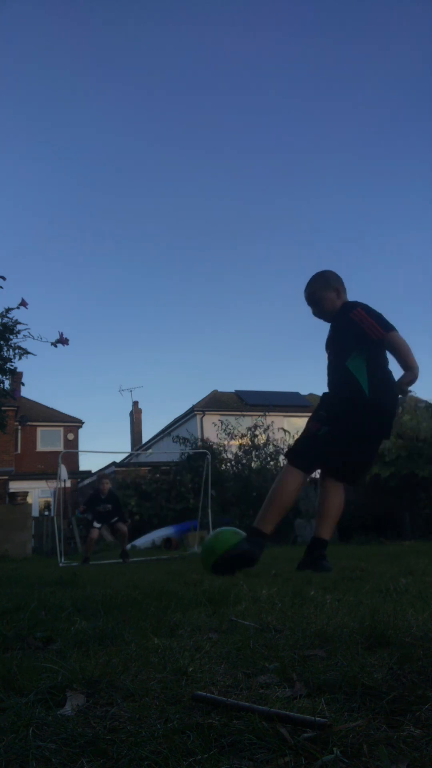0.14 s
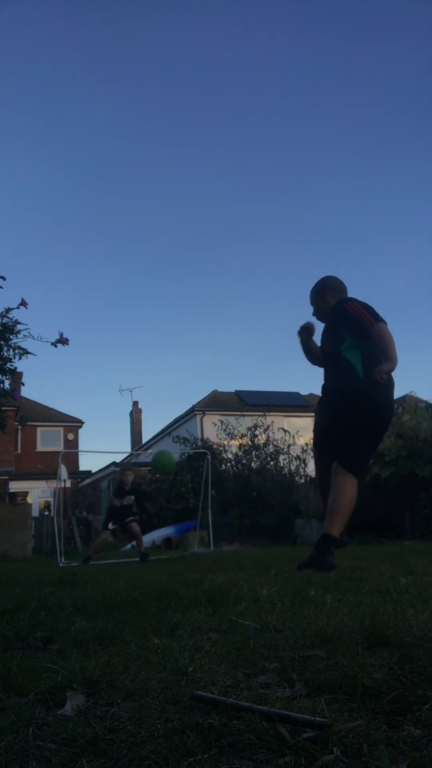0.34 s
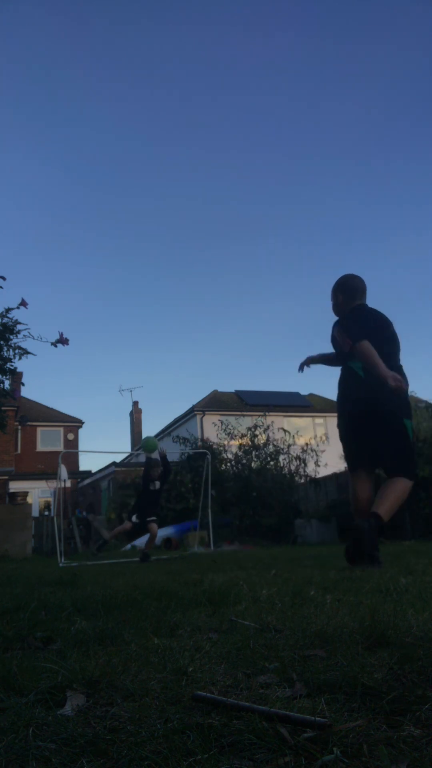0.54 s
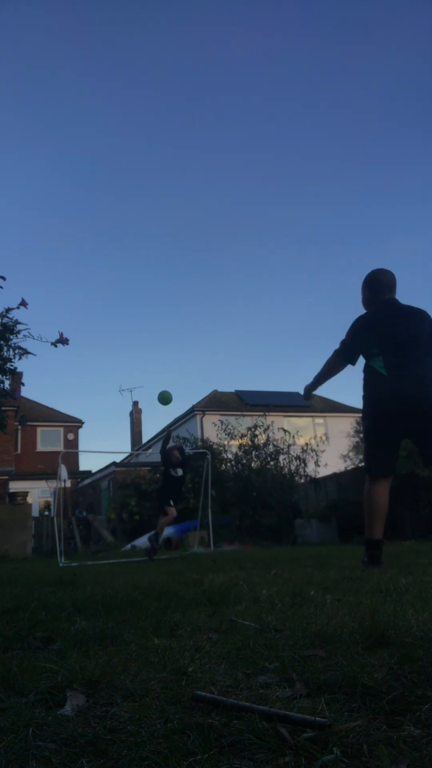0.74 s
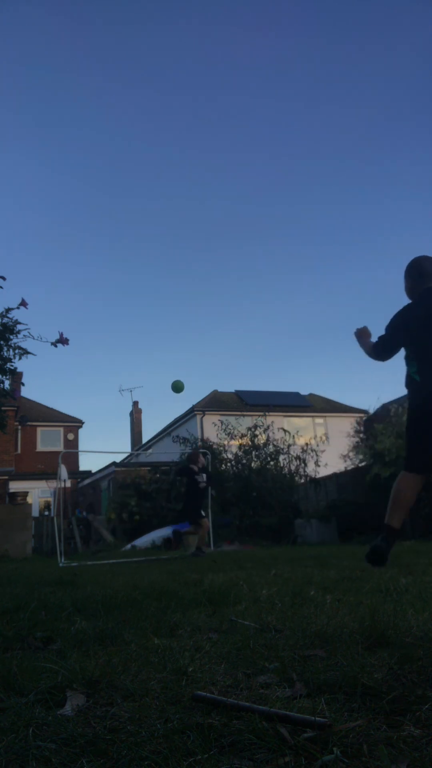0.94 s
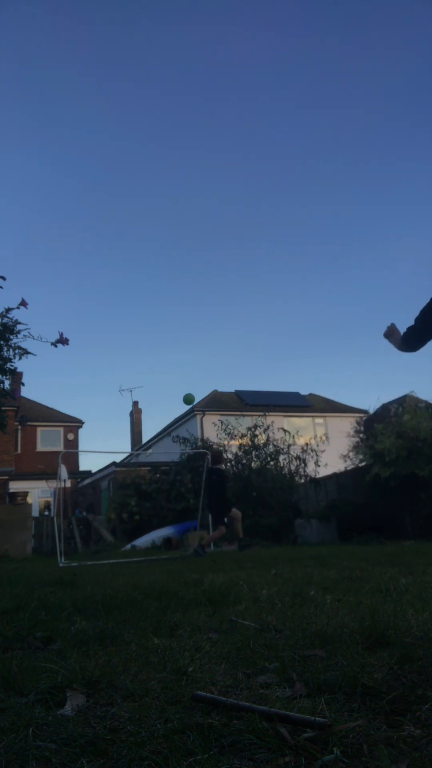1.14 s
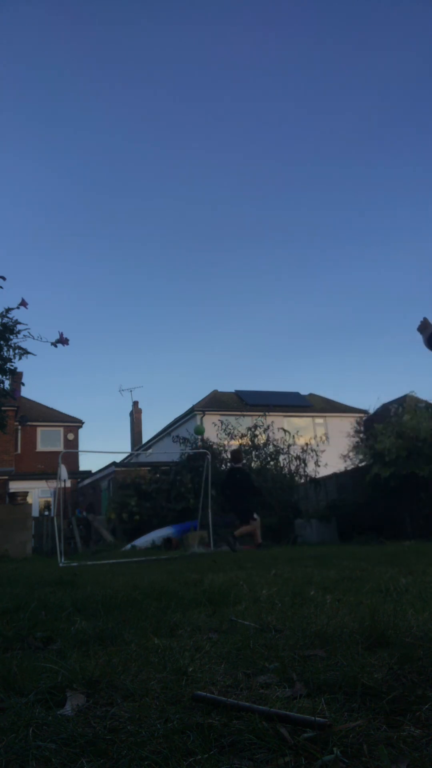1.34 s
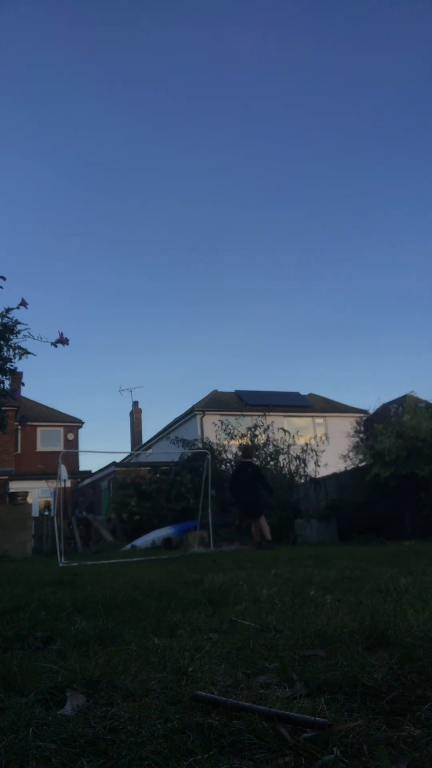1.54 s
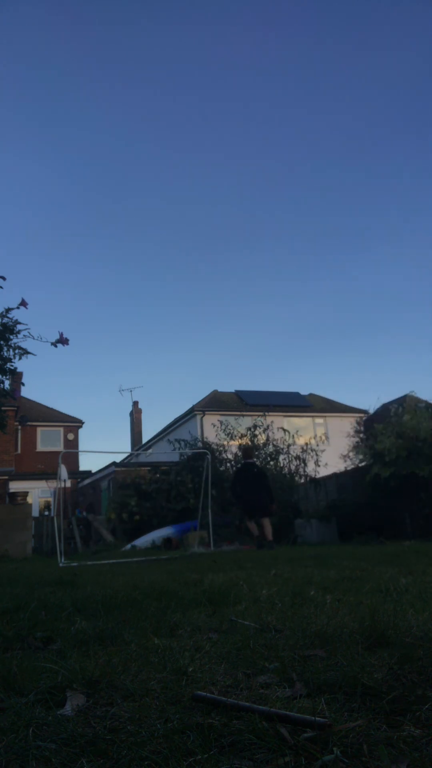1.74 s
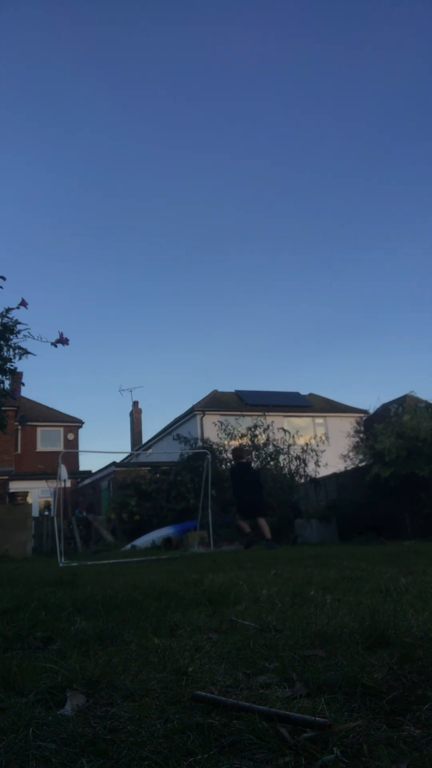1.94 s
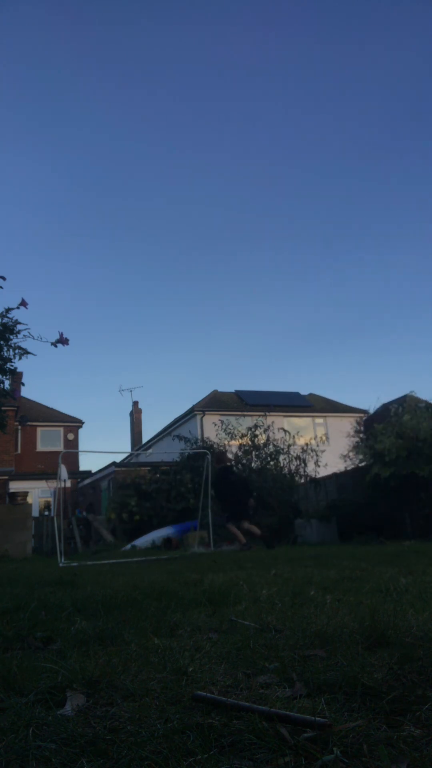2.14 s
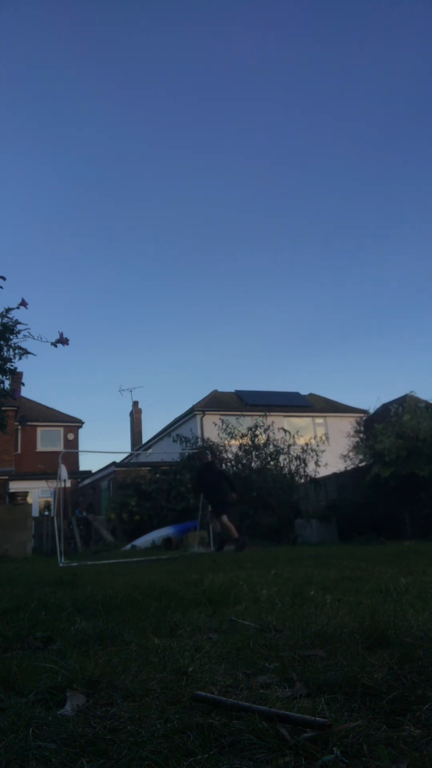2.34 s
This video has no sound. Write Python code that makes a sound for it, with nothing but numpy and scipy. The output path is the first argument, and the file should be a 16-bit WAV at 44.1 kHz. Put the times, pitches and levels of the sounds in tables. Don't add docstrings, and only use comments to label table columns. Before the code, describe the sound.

A football is kicked with a loud, deep, hollow thud and short outdoor echo, then slapped more softly by a keeper; faint footsteps follow and a dull rattling landing at a fence, heard close by a phone.

```python
import sys
import numpy as np
from scipy import signal
from scipy.fft import rfft, irfft
from scipy.io import wavfile
from scipy.ndimage import uniform_filter1d

SR = 44100
rng = np.random.default_rng(int(sys.argv[2]) if len(sys.argv) > 2 else 0)


def magnitude_from_level(level_db):
    exponent = np.asarray(level_db, float) / 20
    return 10 ** exponent


def transcribe(signal):
    frames = np.atleast_2d(signal).T
    limited = np.clip(frames, -1, 1)
    pcm = np.round(limited * 32767).astype(np.int16)
    wavfile.write(sys.argv[1], SR, pcm)


N = 105840

# start_s, ball_db, echo_db, echo_length_scale, echo_tilt_db_per_octave
BALL_HITS = [
    (.2105, -8.5, -31, 1.035, 0.2),
    (.6015, -28, -30, 0.72, 1),
    (2.0825, -36, -31.5, 1.07, -0.5),
]
# pitch_hz, level_db, t60_s (time to fall 60 dB)
BALL_TONES = [(226, 1, 0.027), (350, -4.5, 0.035), (450, 0, 0.034), (672.5, -3.5, 0.022), (945.5, -7, 0.02),
              (1200, -3.5, 0.024), (1420, -9, 0.026), (1713, -9, 0.025), (1950, -16.5, 0.014),
              (2280, -17, .014)]
# freq_hz, level_db
ECHO_COLOUR = [(25, -34.5), (60, 1), (100, -3.5), (200, -3.5), (480, -12.5), (850, -27.5), (1900, -35),
               (16000, -72.5)]
# freq_hz, t60_s
ECHO_LENGTH = [(60, 0.51), (160, 0.49), (420, 0.28), (1100, 0.46), (2900, 0.27), (7700, 0.23)]
# start_s, level_db, t60_s, tilt_db_per_octave
CRACK_EVENTS = [(.194, -46.5, 0.11, -6.5), (.2, -48.5, 0.19, -10), (.2092, -19, 0.017, -8),
                (.2115, -19.5, 0.0078, 3), (.214, -39, 0.17, -4.1), (.241, -40.5, 0.056, -6.5),
                (.26, -43, 0.029, -6.5), (.294, -47.5, .05, -12.5), (.6015, -63, 0.0067, 0),
                (.603, -37.5, 0.028, 0.5), (.608, -55, 0.26, -0.7), (.952, -59, 0.055, -9.5),
                (1.304, -59.5, 0.023, -14), (1.317, -48, 0.044, -15), (1.464, -52, .012, -1),
                (1.481, -44, 0.011, -3), (1.512, -60, .04, 7), (2.0825, -36, 0.017, 4),
                (2.085, -45, 0.19, -0.7)]
# freq_hz, level_db
CRACK_COLOUR = [(150, -45.5), (500, -11.5), (1500, -0.5), (3000, -7), (4500, -6), (7700, -10.5),
                (11000, -15), (16000, -29)]
# start_s, length_s,
# level_db, pitch_hz
DEEP_THUMPS = [(.03, 0.015, -39.5, 53), (.07, 0.068, -36.5, 61), (.2158, 0.029, -8, 76),
               (.25, 0.038, -32.5, 68), (.29, 0.078, -40, 81.3), (.335, 0.049, -40.5, 72),
               (.41, 0.049, -44, 62), (.51, 0.14, -47.5, 65), (.606, 0.051, -28, 74.3),
               (.61, 0.059, -38, 46), (.37, 0.075, -43, 133.4), (.47, 0.059, -42.5, 51),
               (.65, .04, -37, 80), (.44, 0.14, -51.5, 128), (1.0, 0.037, -60, 150),
               (1.45, 0.095, -56.5, 140.9), (2.0, 0.042, -57, 129), (.716, 0.057, -41, 85),
               (.765, .06, -53, 65), (.15, 0.045, -47, 65), (.9, 0.058, -47, 70.6), (.95, 0.072, -55, 63),
               (1.33, 0.12, -52.5, 60), (2.088, 0.014, -33, 74), (2.1025, 0.036, -29.5, 71),
               (2.1, 0.11, -51, 44.4), (2.143, 0.014, -43, 80), (2.169, 0.031, -28, 75),
               (2.203, 0.027, -33, 79.6), (2.243, 0.022, -34.5, 68), (2.288, 0.016, -37, 68.5),
               (2.317, 0.02, -38.5, 68)]
# start_s, level_db, pitch_hz, cycles
KNOCKS = [(.022, -48.5, 244, 3.4), (.046, -37, 160, 0.79), (.054, -46, 650, 5.4),
          (.056, -38.5, 238, 2.5), (.086, -63, 476, 1.6), (.2105, -2.5, 144.3, 0.89),
          (.2405, -21, 270, 1.47), (.240, -28.5, 635, 4.3), (.258, -31.5, 350, 3.2),
          (.47, -39, 266, 1.9), (.491, -31, 257, 2.2), (.52, -38.5, 257, 1.5),
          (.6005, -21.5, 365.3, 3.97), (.608, -29, 263, 1.37), (.61, -48, 159, 1.3),
          (.6035, -27.5, 647, 3.8), (.623, -32.5, 700, 2.3), (.623, -41, 1250, 6),
          (.66, -41.5, 400, 6.6), (.677, -45, 217, 3.8), (.695, -48.5, 261, 5.4), (.72, -55, 460, 3.7),
          (.869, -42.5, 242, 1.3), (.881, -48, 170, 2.2), (.951, -55, 1097, 4), (.97, -57, 1080, 4.2),
          (1.48, -52, 1200, 3.8), (1.5, -51.5, 293, 4.1), (1.545, -54, 241, 5.5),
          (1.304, -44, 1086, 2.4), (1.317, -45.5, 450, 1.67), (1.464, -47.5, 286, 1.83),
          (1.686, -45.5, 347, 1.5), (2.085, -39, 491, 9.8), (2.084, -33.5, 218.7, 2.5),
          (2.092, -36, 315, 1.4), (2.108, -36.5, 470, 4.6), (2.13, -38, 536, 4), (.65, -41, 930, 1.5),
          (2.122, -39.5, 320, 2.8), (2.158, -40, 312, 4.5), (2.176, -43.5, 379, 3.7),
          (2.19, -40.5, 287, 3), (2.21, -44.5, 242, 3.3), (2.226, -46, 262, 2.6),
          (2.262, -49, 200, 4.2)]
# start_s, level_db, pitch_hz, cycles
MORE_KNOCKS = [(.2098, -33, 2100, 4.8), (.2135, -38, 310, 2.2), (.293, -47, 1260, 8),
               (.294, -35.5, 290, 2.65), (.6065, -31, 1200, 3.4), (.612, -26, 196, 1.9),
               (.64, -38.5, 219, 3.2), (.2108, -17.5, 830, 1.13), (.219, -31, 1470, 3.4),
               (.259, -47.5, 2250, 5.2), (.602, -41, 5650, 12.5), (.602, -42, 4030, 8.5),
               (.615, -53, 1620, 6.3), (1.316, -52, 1290, 5.3), (1.328, -55, 480, 4.8),
               (1.506, -56.5, 895, 3.3), (1.513, -59, 1710, 5.1), (1.526, -62, 1012, 4),
               (2.083, -44, 1245, 6.3), (2.096, -25, 73, 3.2), (2.132, -47, 1200, 5),
               (2.145, -49, 450, 9.4)]
# start_s, length_s, level_db, tilt_db_per_octave (lower is
GRASS_SCUFFS = [(.04, 0.15, -59, -5), (.186, 0.03, -52.5, -6), (.26, 0.12, -58.5, -3.5),
                (.43, 0.36, -59, -5.5), (.5, 0.076, -65.5, -3.5), (1.335, 0.076, -64, -6.5),
                (.69, 0.095, -56.5, -7.5), (.85, 0.046, -55.5, -5.5), (.93, 0.12, -68, -7),
                (1.29, 0.073, -69.5, -8.5), (1.455, 0.051, -55.5, -6.5), (1.485, 0.11, -56.5, -4),
                (1.56, 0.12, -64, -3.5), (1.68, 0.05, -59, -6)]
# start_s, length_s, level_db, pitch_hz, width_hz
FUZZY_WHISTLES = [
    (.075, 0.079, -63, 2470, 260),
    (.165, .016, -66, 2443, 200),
    (.3, 0.12, -68.5, 1270, 70),
]
# start_s, level_db
BIRD_LEVEL = [(0, -82), (.4, -77), (.5, -73), (.7, -86), (1.0, -86), (1.4, -75), (1.7, -75.5), (1.9, -83.5),
              (2.05, -67.5), (2.2, -71), (2.4, -76)]
# freq_hz, level_db
HUM_COLOUR = [(15, -47.5), (25, -12.5), (59, 0.5), (161, -15), (263, -15.5), (489, -22), (775, -25),
              (3430, -33.5), (16000, -44.5)]
# freq_hz, level_db
MIC_TINT = [(3500, -0.5), (5000, -1), (6200, 1.47), (9300, -2), (10500, -5), (12000, -1.5)]


def evened(x):
    return x / np.sqrt(np.mean(x ** 2) + 1e-20)


def read(points, hz):
    point_hz, value = np.transpose(points)
    return np.interp(np.log(hz + 1), np.log(point_hz + 1), value)


def coloured(x, points):
    gain = magnitude_from_level(read(points, np.fft.rfftfreq(len(x), 1 / SR)))
    return evened(irfft(rfft(x) * gain, len(x)))


def drift(size, smooth_s):
    width = max(int(smooth_s * SR), 2)
    once = uniform_filter1d(rng.standard_normal(size), width)
    return evened(uniform_filter1d(once, width))


def resonate(x, hz, width_hz):
    turn = np.exp(2j * np.pi * np.cumsum(hz * np.ones(len(x))) / SR)
    memory = np.exp(-np.pi * width_hz / SR)
    smooth = signal.lfilter([1 - memory], [1, -memory], x / turn)
    return 2 * (turn * smooth).real


def ball_ring(t, level_db):
    ring = 0
    for k, (hz, db, t60_s) in enumerate(BALL_TONES):
        sign = (-1) ** (k + 1)
        ring = ring + sign * magnitude_from_level(db - 60 * t / t60_s) * np.sin(2 * np.pi * hz * t)
    contact_s = 0.00041
    return ring * (1 - np.exp(-t / contact_s)) ** 2 * magnitude_from_level(level_db)


def fence_echo(t, level_db, length_scale, tilt_db):
    rise_s, lump_db, lump_s = 0.0013, 1.5, 0.0029
    colour = [(hz, db + tilt_db * np.log2(hz / 300)) for hz, db in ECHO_COLOUR]
    noise = coloured(rng.standard_normal(len(t)), colour)
    hz, frame_s, z = signal.stft(noise, SR, nperseg=512)
    t60_s = length_scale * read(ECHO_LENGTH, hz)[:, None]
    echo = signal.istft(z * magnitude_from_level(-60 * frame_s / t60_s), SR, nperseg=512)[1][:len(t)]
    return echo * (1 - np.exp(-t / rise_s)) * magnitude_from_level(level_db + lump_db * drift(len(t), lump_s))


def ball_hit(ball_db, echo_db, length_scale, tilt_db):
    t = np.arange(SR // 2) / SR
    return ball_ring(t, ball_db) + fence_echo(t, echo_db, length_scale, tilt_db)


def crack(level_db, t60_s, tilt_db):
    rise_s = 0.0013
    t = np.arange(SR // 4) / SR
    colour = [(hz, db + tilt_db * np.log2(hz / 1500)) for hz, db in CRACK_COLOUR]
    burst = coloured(rng.standard_normal(len(t)), colour)
    return burst * np.minimum(t / rise_s, 1) * magnitude_from_level(level_db - 60 * t / t60_s)


def thump(length_s, level_db, hz):
    t = np.arange(0, length_s, 1 / SR)
    hump = np.sin(np.pi * (t / length_s) ** 0.33) ** 0.75
    return -magnitude_from_level(level_db) * hump * np.sin(2 * np.pi * hz * t)


def knock(level_db, hz, cycles):
    u = np.arange(0, 1, hz / cycles / SR)
    hump = np.sin(np.pi * u ** 1.45) ** 0.56
    return magnitude_from_level(level_db) * hump * np.sin(2 * np.pi * cycles * u ** 0.913)


def scuff(length_s, level_db, tilt_db):
    size, blades_per_s, blade_db = 8192, 3800, 2
    strength = magnitude_from_level(blade_db * rng.exponential(1, size))
    snapping = rng.random(size) < blades_per_s / SR
    snaps = rng.standard_normal(size) * (0.35 + strength * snapping)
    swish = coloured(snaps, [(60, -24), (200, 2.0), (1600, 3 * tilt_db), (6400, 4.7 * tilt_db),
                             (16000, 5 * tilt_db - 11.5)])
    u = np.arange(0, 1, 1 / (length_s * SR))[:size]
    return magnitude_from_level(level_db) * swish[:len(u)] * np.sin(np.pi * u ** 0.6)


def squeak(length_s, level_db, hz, width_hz):
    u = np.arange(0, 1, 1 / (length_s * SR))
    noise = rng.standard_normal(8192)[:len(u)]
    whistle = evened(resonate(resonate(noise, hz, width_hz), hz, width_hz))
    return magnitude_from_level(level_db) * whistle * np.sin(np.pi * u ** 0.37) ** 0.5


def birds():
    centre_hz, spread_hz, swing_hz, width_hz = 3740, 550, 180, 350
    flock = 0
    for place in np.linspace(-1, 1, num=7):
        hz = centre_hz + spread_hz * place + swing_hz * drift(N, 0.033)
        voice = resonate(resonate(rng.standard_normal(N), hz, width_hz), hz, width_hz)
        flock = flock + evened(voice) * magnitude_from_level(1.6 * drift(N, 0.025))
    start_s, level_db = np.transpose(BIRD_LEVEL)
    return magnitude_from_level(np.interp(np.arange(N) / SR, start_s, level_db)) * evened(flock)


def hum():
    return magnitude_from_level(-60) * coloured(rng.standard_normal(N), HUM_COLOUR)


def add(mix, start_s, sound):
    part = mix[round(start_s * SR):][:len(sound)]
    part += sound[:len(part)]


def scene():
    mix = hum() + birds()
    layers = [(BALL_HITS, ball_hit), (CRACK_EVENTS, crack), (DEEP_THUMPS, thump), (KNOCKS, knock),
              (MORE_KNOCKS, knock), (GRASS_SCUFFS, scuff), (FUZZY_WHISTLES, squeak)]
    for events, source in layers:
        for start_s, *settings in events:
            add(mix, start_s, source(*settings))
    return mix[None]


def top_cut(x):
    return signal.sosfilt(signal.butter(12, 16440, fs=SR, output="sos"), x)


def record(dry):
    rumble_cut_hz, edge_hz, headroom = 42, 15800, 1.1
    hz = np.fft.rfftfreq(N, 1 / SR)
    tint_db = read(MIC_TINT, hz) - 0.049 * np.maximum(hz - edge_hz, 0)
    tinted = irfft(rfft(dry) * magnitude_from_level(tint_db), N)
    bass_cut = signal.butter(4, rumble_cut_hz, "high", fs=SR, output="sos")
    thinned = signal.sosfilt(bass_cut, tinted)
    mix = headroom * np.tanh(thinned / headroom)
    return top_cut(mix)


dry = scene()
out = record(dry)
transcribe(out)
```